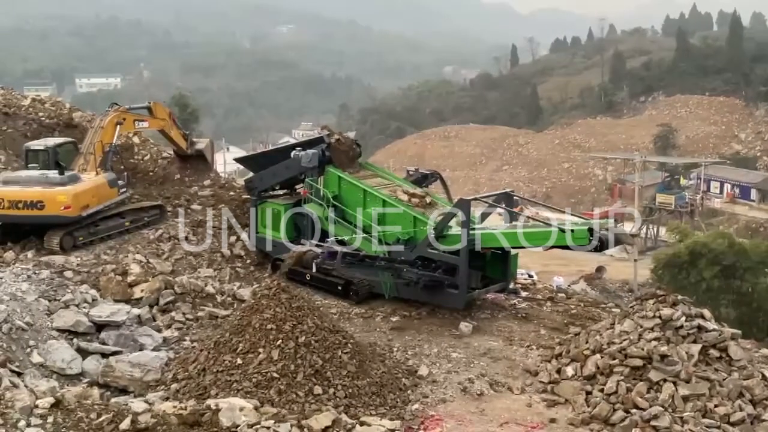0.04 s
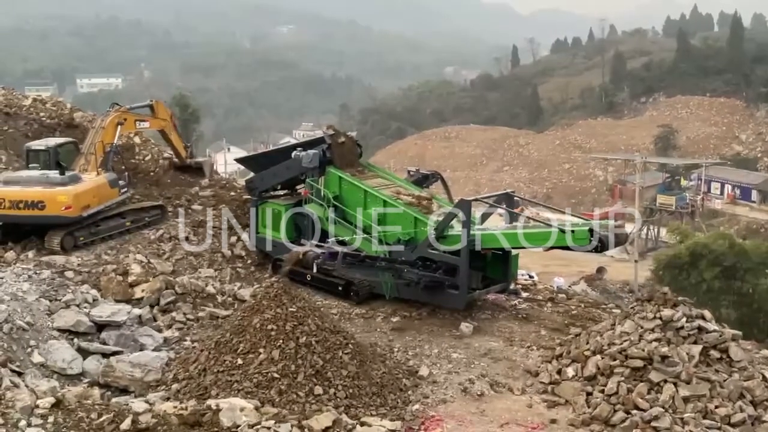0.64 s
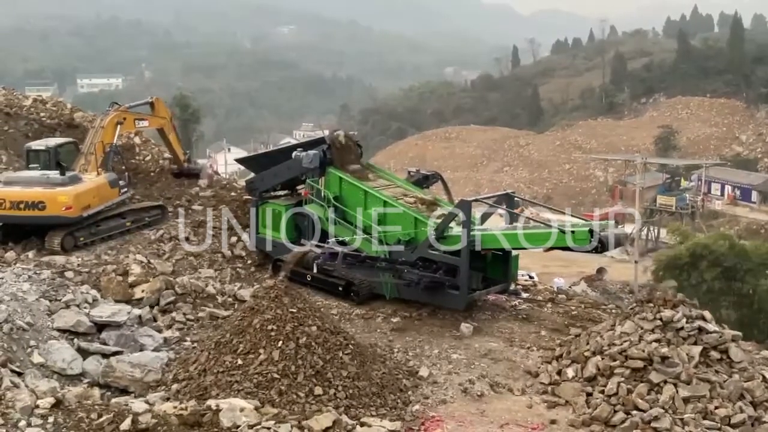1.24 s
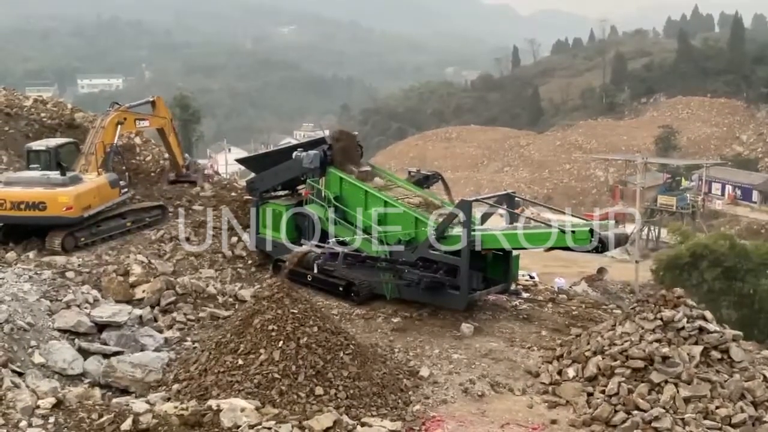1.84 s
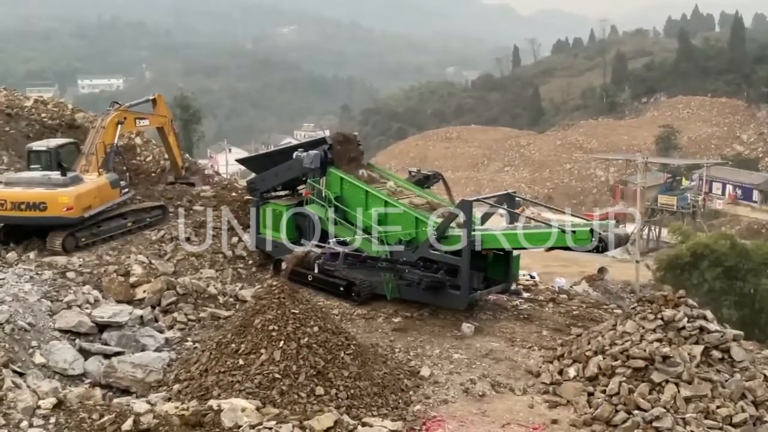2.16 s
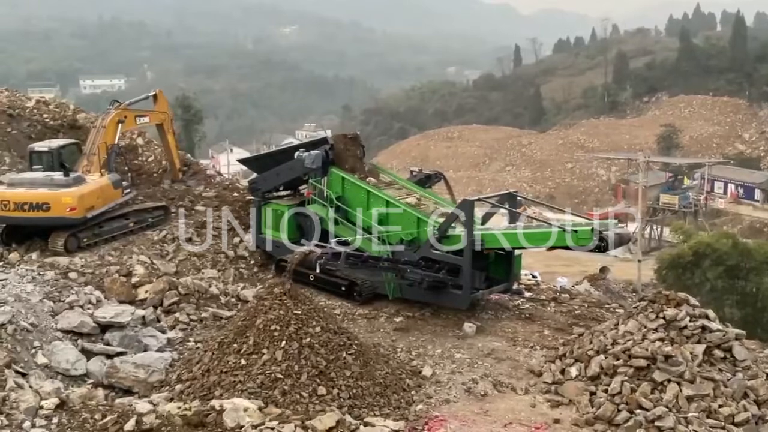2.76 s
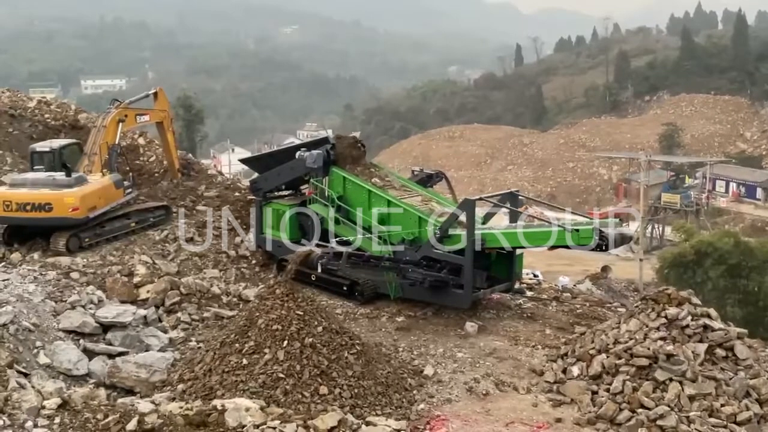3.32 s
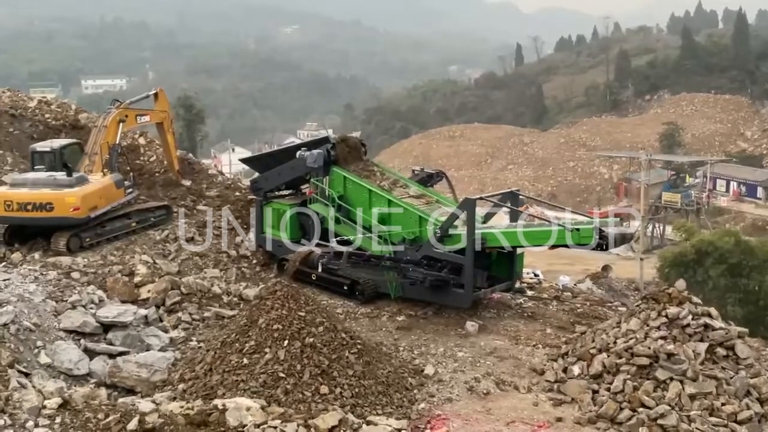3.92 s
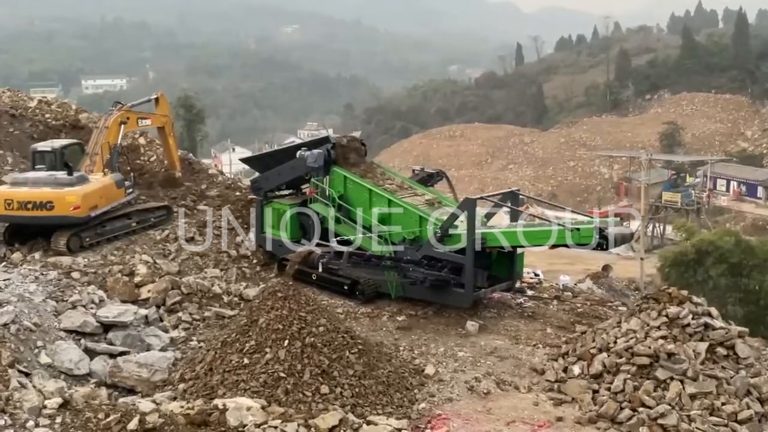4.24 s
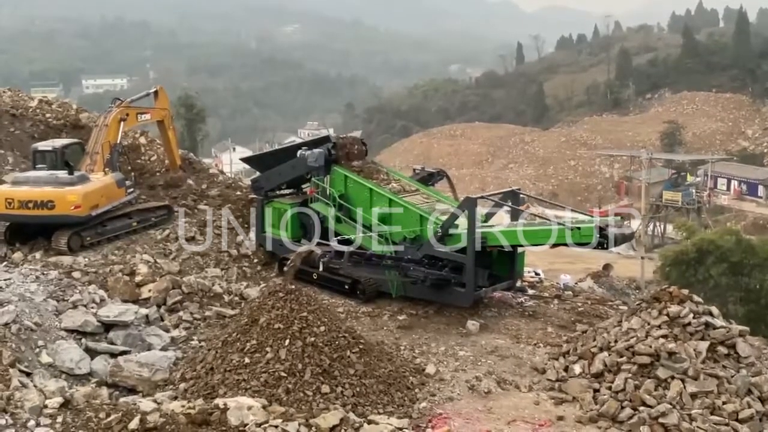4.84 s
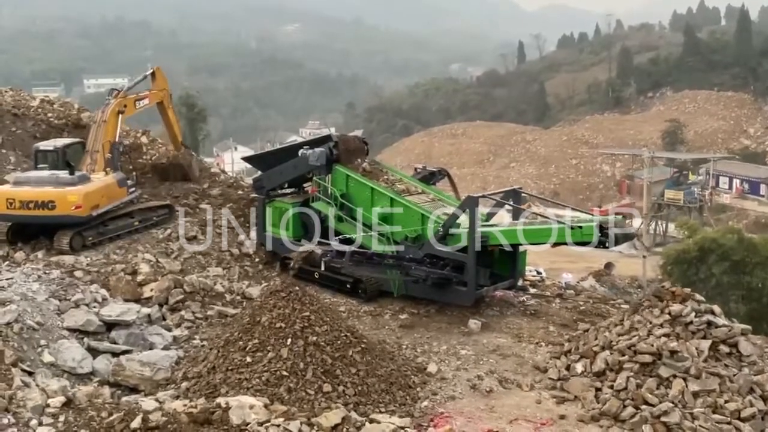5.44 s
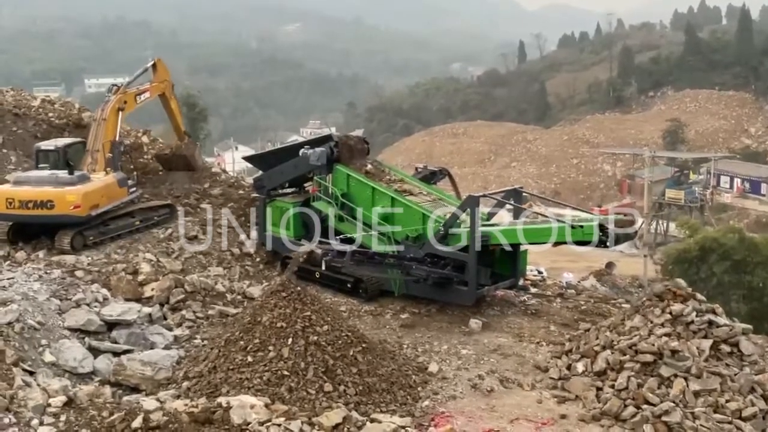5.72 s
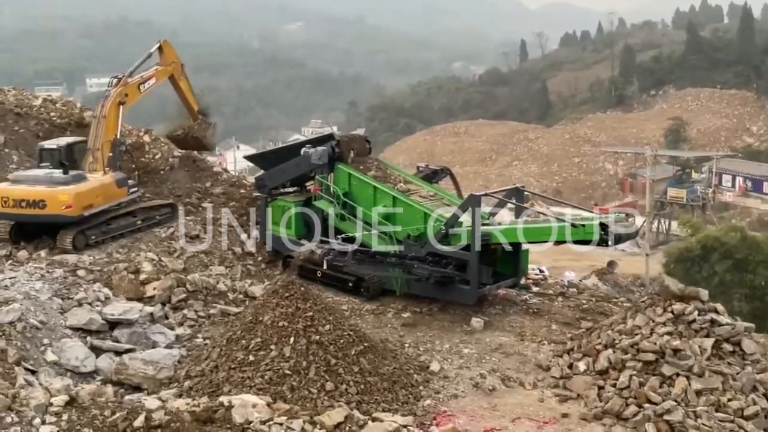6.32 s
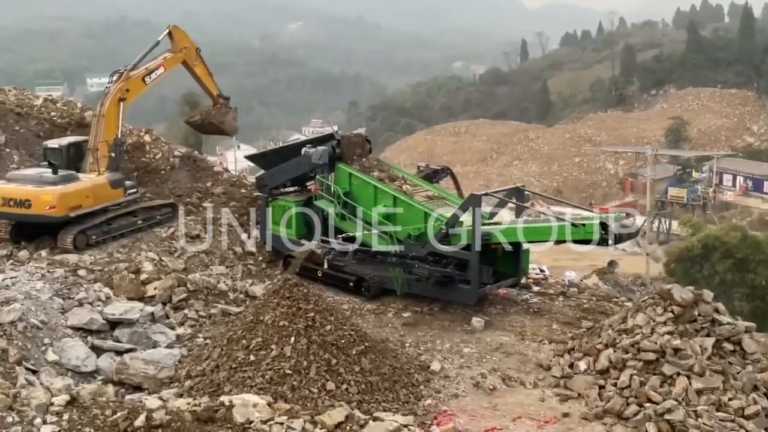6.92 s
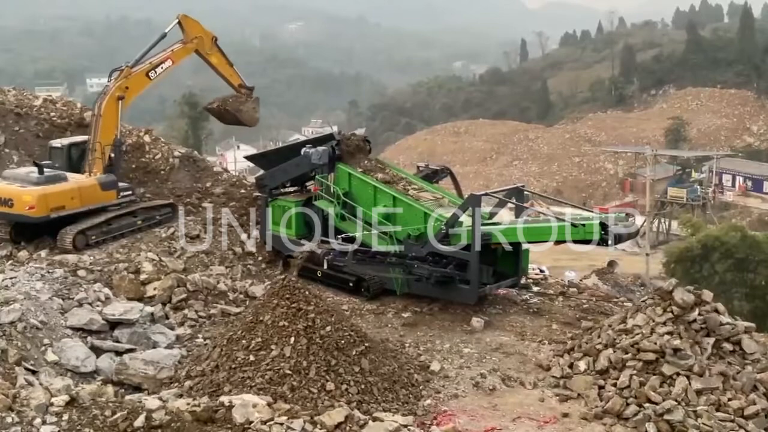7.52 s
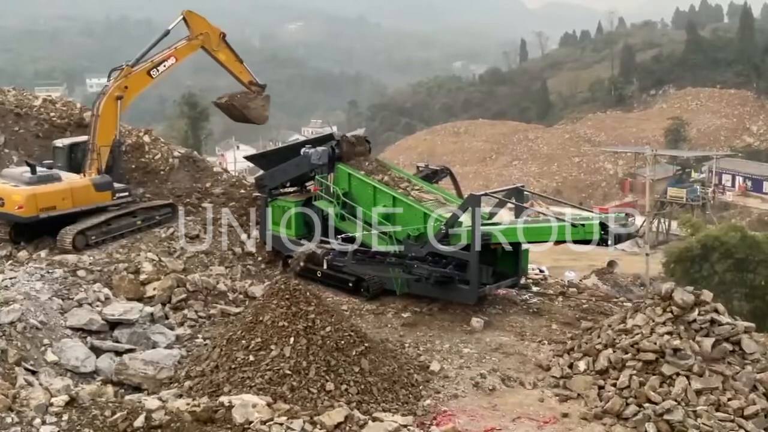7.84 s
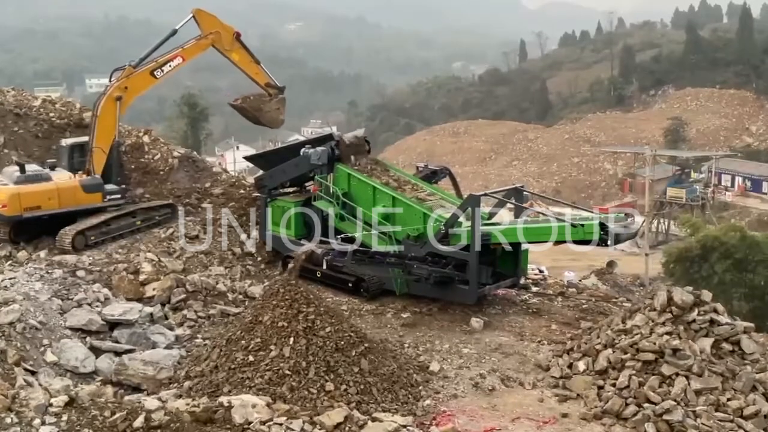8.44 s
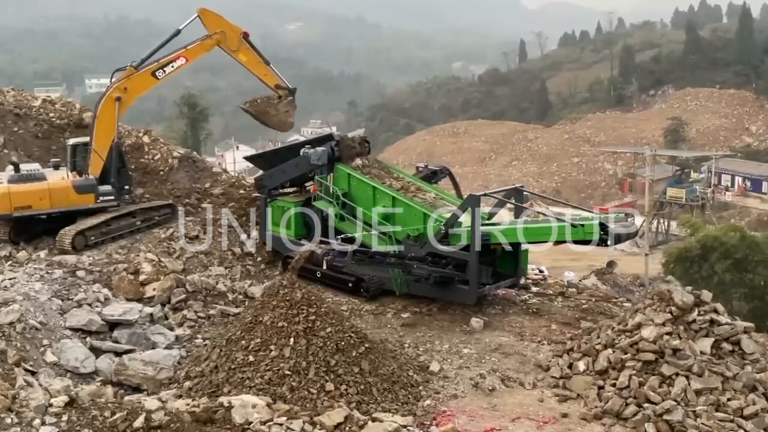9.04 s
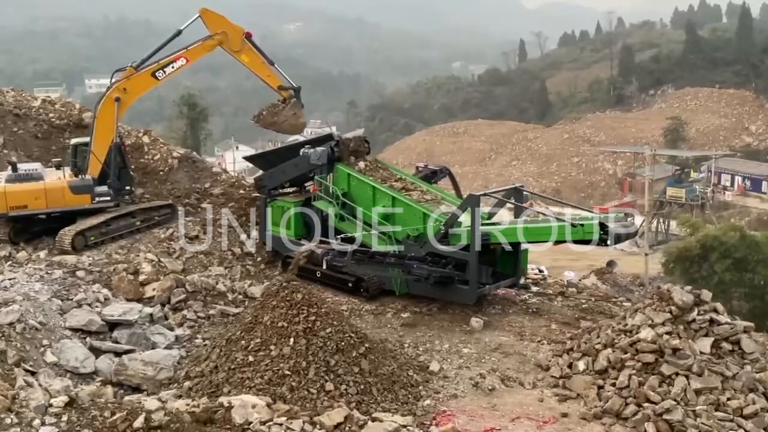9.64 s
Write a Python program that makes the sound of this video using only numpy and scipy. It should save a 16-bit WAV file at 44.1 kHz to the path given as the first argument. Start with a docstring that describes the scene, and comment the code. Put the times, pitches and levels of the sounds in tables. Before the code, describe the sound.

A rock screening machine works some way off in an open quarry. Stones and grit clatter in surges over its shaking steel deck, large stones knock and clang, and boulders draw hollow booms from the panels. Diesel engines drone underneath with an excavator's faint whine. The clatter thins twice, then grows heavy again near the end, with a short echo off the rock heaps.

```python
"""A mobile screening plant, a big shaking sieve for rock, works some way off in an open quarry.
From the start diesel engines drone, an excavator's pump whines faintly and rock clatters in surges over
the steel deck. Large stones knock and clang, boulders make the panels boom, and at 0.7 s comes the first
of a few squeaks. The load thins near 4.5 s, the whine shifts as the excavator lifts its arm at 5.8 s, and
after another lull the rock is heavy again by 8 s. All along, heaps of waste rock scatter the clatter."""
import sys
import numpy as np
from scipy import signal
from scipy.fft import rfft, irfft, next_fast_len
from scipy.io import wavfile
from scipy.ndimage import map_coordinates

SR = 44100
rng = np.random.default_rng(int(sys.argv[2]) if len(sys.argv) > 2 else 0)


def transcribe(u):
    """Save the signal u as a 16-bit wav file named by the first command-line argument.

    u: samples, shape (n,) or (channels, n), limited to [-1, 1]; the rate is SR.
    q: integer samples, one column per channel.
    """
    v = np.clip(np.atleast_2d(u).T, -1, 1)
    q = np.round(v * 32767).astype(np.int16)
    wavfile.write(sys.argv[1], SR, q)


N = 426447


def amp(db):
    """Turn decibels into a number to multiply by."""
    return 10 ** (np.asarray(db) / 20)


def unit(x):
    """Scale a sound to an average (rms) strength of 1."""
    return x / np.sqrt(np.mean(x ** 2) + 1e-20)


def along(points, hz):
    """Read between (frequency, value) points, spacing the frequencies by octaves."""
    f, v = np.transpose(points)
    return np.interp(np.log(hz + 1), np.log(f + 1), v)


def curve(points):
    """Join (time, value) points with straight lines, one value a sample."""
    return np.interp(np.arange(N) / SR, *np.transpose(points))


def wobble(rate):
    """A smooth curve through `rate` random values a second."""
    return map_coordinates(rng.standard_normal(int(N * rate / SR) + 4), [np.arange(N) * rate / SR])


def coloured(x, db_at):
    """Turn each frequency up or down by db_at(frequency) decibels."""
    m = 2 * next_fast_len(N // 2 + SR // 4)
    cepstrum = irfft(np.log(amp(db_at(np.fft.rfftfreq(m, 1 / SR))) + 1e-6))
    cepstrum[1:m // 2] *= 2  # folded so that ringing follows a hit and never comes before it
    cepstrum[m // 2 + 1:] = 0
    return irfft(rfft(x, m) * np.exp(rfft(cepstrum)), m)[:N]


def shaped(x, tone):
    """Give a sound the tone of a (frequency, level) table."""
    return coloured(x, lambda hz: along(tone, hz))


def add(track, s, sound):
    """Mix a sound into a track at s seconds."""
    start = max(round(s * SR), 0)
    track[start:start + len(sound)] += sound[:N - start]


def contacts(rate, spread_db):
    """Tiny hits of random size at random moments, about `rate` a second."""
    hit = rng.random(N) < rate / SR
    return hit * rng.choice([-1, 1], N) * amp(spread_db * np.clip(rng.standard_normal(N), -2, 2))


def swell(start, length, attack, release):
    """A volume that rises, holds and dies away; all times are in seconds."""
    t = np.maximum(np.arange(N) / SR - start, 0)
    return (1 - np.exp(-t / attack)) * np.exp(-np.maximum(t - length, 0) / release)


# How loud the exhaust is: (time [s], level [dB])
EXHAUST_LEVEL = [(0.0, -38), (0.54, -37), (0.97, -35.5), (1.78, -32.5), (2.26, -33.5), (4.15, -35.5),
                 (4.3, -38.5), (5.41, -31), (7.35, -38), (8.8, -32.5), (9.67, -39)]
# The notes in its drone: (pitch [times the engine speed], relative level [dB])
EXHAUST_NOTES = [(3, -6.5), (5, -5.5), (8, -4.5), (10, -6), (12, -1.5), (15, 1.5), (18, -9)]
# The tone of the fans and belts: (frequency [Hz], relative level [dB])
FAN_TONE = [(10, -35), (28, -28), (45, -12), (62, -16), (85, -0.5), (105, -10), (200, 1.5), (400, -5),
            (1000, -4.5), (3000, -31), (9000, -74)]
def engines(crank_hz=17.35, drift_hz=0.1282, flutter_db=2.5, slip_turns=0.025):
    """Diesel exhaust drones in step with the turning engine, over the roar of fans and belts."""
    turns = np.cumsum(crank_hz + drift_hz * wobble(3)) / SR
    drone = np.zeros(N)
    for multiple, db in EXHAUST_NOTES:
        gain = amp(db + flutter_db * wobble(9))
        cycles = round(multiple) * (turns + slip_turns * wobble(11))  # higher notes come out rougher
        drone += gain * np.sin(2 * np.pi * (cycles + rng.random()))
    roar = amp(-30) * unit(shaped(rng.standard_normal(N), FAN_TONE))
    return amp(curve(EXHAUST_LEVEL)) * drone + roar


# The notes in the whine: (pitch [times the pump's pitch], level [dB], change during the lift [dB])
PUMP_NOTES = [(2, -41, -5), (3, -43.5, 5), (4, -46, -2)]
def pump(pitch_hz=241.5, waver_hz=2.193, throb_hz=22.12, throb_depth=0.58, flutter_db=4.5):
    """The oil pump's pistons make a throbbing whine; its middle note stands out while the arm lifts."""
    turns = np.cumsum(pitch_hz + waver_hz * (wobble(3) + wobble(40))) / SR
    lift = swell(start=5.84, length=3.4, attack=.2, release=.3)
    throb = 1 + throb_depth * np.sin(2 * np.pi * np.cumsum(throb_hz + 2 * wobble(4)) / SR)
    whine = np.zeros(N)
    for multiple, db, lift_db in PUMP_NOTES:
        gain = amp(db + lift_db * lift + flutter_db * wobble(10))
        whine += gain * np.sin(2 * np.pi * round(multiple) * turns)
    return throb * whine


# The layer of rock that always lies on the deck: (time [s], level [dB])
ROCK_LOAD = [(0.0, -21.5), (0.6, -22), (0.85, -24), (1.08, -22), (1.21, -25), (1.35, -22), (1.94, -20.5),
             (2.2, -23), (2.31, -24.5), (2.52, -21), (2.68, -20), (3.09, -25), (3.26, -27), (3.42, -24.5),
             (3.55, -19.5), (3.78, -25.5), (4.09, -23), (4.35, -27), (4.55, -28.5), (4.79, -30),
             (4.92, -28), (5.03, -28), (5.3, -24), (5.63, -22), (6.25, -28), (6.5, -28.5), (6.68, -30.5),
             (7.05, -29), (7.35, -28.5), (7.85, -24), (8.2, -22.5), (8.45, -21), (8.64, -24.5),
             (8.8, -22.5), (8.94, -27.5), (9.05, -24.5), (9.15, -25), (9.3, -22), (9.67, -21.5)]
# Fresh rock spilling onto it:
# (start [s], length [s], clatter [dB], boom against clatter [dB], grit against clatter [dB])
ROCK_SPILLS = [(0.0, 0.044, -22.5, -3, -18), (0.12, 0.033, -23, -7, -15), (0.468, 0.092, -26.5, 2, -16),
               (.92, 0.075, -24, -16, -10), (1.28, 0.052, -29, -13, -7), (1.687, 0.11, -32.5, -7, -4.5),
               (1.78, 0.044, -24, -9, -16), (2, 0.047, -24, 4.5, -5), (2.18, 0.058, -25, 4.5, -13),
               (2.437, 0.09, -30.5, -4, -4.5), (2.608, 0.14, -20.5, 1, -9), (2.895, 0.067, -24.5, -2, -7),
               (3.21, 0.091, -21, -0.5, -9), (3.31, 0.12, -19.5, -1, -9), (3.593, 0.093, -22.5, -0.5, -8),
               (3.86, 0.13, -27, 2, -7.5), (3.964, 0.18, -26.5, 0, -6), (4.4, 0.066, -29.5, 1, -22),
               (4.8, 0.12, -31, 6, -8.5), (5.11, 0.07, -32.5, 3, -4), (5.378, 0.09, -22.3, -6, -8.5),
               (5.565, 0.17, -28.5, -17, -9), (5.916, 0.14, -22, 2.5, -10), (6.327, 0.064, -28, 4, -13),
               (6.463, 0.084, -27, -1, -12.5), (6.89, 0.04, -30, -10, -21), (7.005, 0.03, -28.5, -12, -15),
               (7.31, 0.03, -38, -1, -2.5), (7.408, 0.037, -28.5, -15, -7.5),
               (7.562, 0.034, -36.5, -13, -2), (7.62, 0.053, -29, 2, -16), (7.773, 0.21, -26.5, -7, -17),
               (8.153, 0.053, -27.5, -8, -8), (8.311, 0.064, -20, 0.5, -12.5), (8.715, 0.08, -26, -3, -10),
               (8.987, 0.031, -23, -1, -9), (9.303, 0.048, -24, -11, -22), (9.43, 0.05, -25.5, -6, -8)]
def rock_flow():
    """The lying rock and the spills add up to three changing levels in dB: clatter, boom and grit."""
    load_db = curve(ROCK_LOAD)
    usual_db = load_db.mean()
    extra_db = load_db - usual_db
    clatter = amp(load_db - 1.5) ** 2
    boom = amp(usual_db - 1 + 0.7 * extra_db) ** 2
    grit = amp(usual_db - 13.5 + 0.98 * extra_db) ** 2
    for s, length, db, boom_db, grit_db in ROCK_SPILLS:
        power = (amp(db) * swell(s, length, attack=0.0084, release=0.053)) ** 2
        clatter += power
        boom += power * amp(boom_db) ** 2
        grit += power * amp(grit_db) ** 2
    return 10 * np.log10([clatter, boom, grit])


# The tones of stones, grit and fine sand hitting the deck: (frequency [Hz], relative level [dB])
STONE_TONE = [(120, -32.5), (300, -10.5), (480, -5), (600, -4.5), (780, -3), (1000, -1.5), (1250, -2),
              (1700, -3), (2300, -9), (2900, -17.5), (3700, -17), (5000, -30), (9000, -64.5)]
GRIT_TONE = [(800, -26.5), (2200, 0), (3600, 0), (4800, -6.5), (7000, -9.5), (9000, -27.5), (10500, -20),
             (13400, -36), (14400, -46), (15200, -51)]
SAND_TONE = [(1500, -18), (5000, -0.5), (10500, -3), (13300, -8), (15000, -37)]
def shaking_deck(clatter_db, boom_db, grit_db, shake_hz=16.562):
    """Every shake throws the rock up; a thin load rattles most clearly in step with the deck."""
    throw = np.cos(2 * np.pi * (shake_hz * np.arange(N) / SR - .44))
    shake = throw * np.clip(0.5 - 0.079 * (clatter_db - clatter_db.mean()), 0, 2)
    clumps = wobble(70)
    stones = amp(-4) * unit(shaped(contacts(rate=2200, spread_db=3), STONE_TONE))
    stones += amp(-6.5) * bars() + amp(-7) * clacks()
    stones *= amp(clatter_db + 1.4 * shake + 0.22 * clumps)
    grit = unit(shaped(contacts(rate=4000, spread_db=0.5), GRIT_TONE)) + amp(-5.5) * clinks()
    grit *= amp(grit_db - 0.46 + 1.1 * shake + 0.8 * clumps)
    # big spills carry more sand, so they sound brighter
    sand_db = grit_db - 22.5 + 0.71 * (grit_db - grit_db.mean())
    sand = amp(sand_db) * unit(shaped(contacts(rate=9000, spread_db=0), SAND_TONE))
    boom = amp(boom_db - 3.5) * unit(panels(contacts(rate=1800, spread_db=2)))
    return stones + grit + sand + boom


# How the sieve's bars and the chute walls ring: (pitch [Hz], width [Hz], relative level [dB])
BAR_RINGS = [(470, 95, -2.5), (697, 64, -0.5), (863, 44, -4), (1000, 47, -2), (1650, 170, -2.5),
             (2290, 105, -4), (2893, 65, -10), (3660, 320, -12)]
def bars(uneven_db=2.0):
    """Each steel part rings as its own stones hit it, in fits and starts."""
    out = np.zeros(N)
    for hz, width, db in BAR_RINGS:
        ring = signal.lfilter(*signal.iirpeak(hz, hz / width, SR), contacts(rate=170, spread_db=3.5))
        ring = signal.sosfilt(signal.butter(2, [hz / 2, hz * 1.6], "band", fs=SR, output="sos"), ring)
        out += amp(db + uneven_db * wobble(11)) * unit(ring)
    return unit(out)


def clacks(rate=75, pitch_hz=1000, octaves=2.3, overtone=1.55, t60=0.061, spread_db=8):
    """Fist-sized stones clack with two short notes each; t60 is the seconds taken to fade by 60 dB."""
    out, t = np.zeros(N), np.arange(SR // 12) / SR
    for when, pitch, size, shape in rng.random((int(rate * N / SR), 4)):
        angle = 2 * np.pi * pitch_hz * 2 ** (octaves * (pitch - .5)) * t
        notes = np.sin(angle) - .5 * np.sin((overtone + .5 * shape) * angle)
        add(out, when * (N - 1) / SR, amp(spread_db * size - 60 * t / t60) * notes)
    return unit(out)


def clinks(rate=170, pitch_hz=3200, octaves=2.3, t60=0.1):
    """Hard chips each ring briefly at their own pitch, the higher ones more softly."""
    out, t = np.zeros(N), np.arange(SR // 20) / SR
    for when, pitch, size in rng.random((int(rate * N / SR), 3)):
        hz = pitch_hz * 2 ** (octaves * (pitch - .5))
        fade = amp(8.7 * size - 14 * pitch - 60 * t / t60)
        add(out, when * (N - 1) / SR, fade * np.sin(2 * np.pi * hz * t))
    return unit(out)


# How the deck and hopper panels ring: (pitch [Hz], width [Hz], relative level [dB])
PANEL_RINGS = [(134, 21, -2.5), (167, 41, -11.5), (207.3, 32, 2.5), (257, 52, -1), (324, 29, -5),
               (438, 49, -6.5)]
def panels(blows):
    """Blows draw a hollow boom from the steel panels, which give off little deep bass."""
    def db_at(f):
        power = sum(amp(db) ** 2 * (f * width) ** 2 / ((hz * hz - f * f) ** 2 + (f * width) ** 2)
                    for hz, width, db in PANEL_RINGS)
        given_off_db = along([(70, -20), (105, -10), (130, 5), (500, 3.5), (1200, -12.5)], f)
        return 10 * np.log10(power + 1e-12) + given_off_db
    return coloured(blows, db_at)


# The slow rise and fall of the rumble: (time [s], relative level [dB])
RUMBLE_LEVEL = [(0.0, -50), (0.35, -68), (4.15, -45), (4.66, -61), (6.27, -51), (7.54, -61), (8.0, -48),
                (9.67, -55)]
# The tone of the shaking ground: (frequency [Hz], relative level [dB])
GROUND_TONE = [(8, -21), (25, -10), (45, -2), (65, 1.5), (100, -4), (200, -25), (600, -62)]
def frame_rumble(boom_db):
    """The machine's frame rumbles on the ground, more so under heavy rock."""
    level_db = curve(RUMBLE_LEVEL) + 9 + 0.65 * (boom_db - boom_db.mean())
    return amp(level_db) * unit(shaped(contacts(rate=400, spread_db=0), GROUND_TONE))


# Large stones striking steel:
# (time [s], strength [dB], splinters against strength [dB], clang level [dB], bar's pitch [Hz])
STONE_HITS = [(.026, -10, -27, -19, 1162), (.15, -2, -25, -24, 705), (.172, -4, -24, -24, 1060),
              (.21, -9, -25, -28, 1500), (.511, 1, -28, -17, 910), (.559, -3, -27, -16, 1000),
              (.929, -10, -28, -20, 1550), (.984, -10, -24, -15.5, 1786), (1.053, -8, -26, -21, 947),
              (1.167, -1, -23, -28, 1700), (1.23, -3.5, -28, -30, 1300), (1.295, -14, -25, -21, 1700),
              (1.835, -5, -27, -18, 650), (1.886, -5, -24, -32, 990), (2.006, -6, -26, -17, 996),
              (2.02, -4, -22, -19, 2030), (2.071, -12, -28, -18, 434), (2.112, -13, -27, -19, 1020),
              (2.185, -4, -27, -24, 1050), (2.2, -2, -27, -23, 1500), (2.254, -11, -29, -22, 1090),
              (2.441, -3, -20, -25, 2250), (2.718, -8, -26, -28, 980), (2.941, -14, -26, -18, 465),
              (3.225, -16, -28, -36, 990), (3.353, -3, -24, -17, 976), (3.616, -3, -25, -34, 1000),
              (3.671, -6, -25, -21, 1291), (4.046, -5, -16, -34, 990), (4.109, -11, -24, -20, 1580),
              (4.322, -15, -7, -44, 990), (4.441, -18, -27, -26, 689), (4.463, -13, -27, -23, 861),
              (4.907, -10, -15, -25, 636), (5.151, -4.5, -23, -22, 1000), (5.391, -10, -22, -34, 1400),
              (5.502, -8, -29, -34, 760), (5.64, -7, -25, -18, 1205), (5.686, -17, -29, -21, 895),
              (6.012, -6, -23, -14, 977), (6.043, -14, -28, -15, 425), (6.344, -11, -29, -25, 556),
              (6.366, -14, -27, -19, 473), (6.515, -13, -27, -22, 818), (6.548, -22, -28, -20, 473),
              (6.729, -15, -15, -24, 730), (6.899, -11, -24, -28, 1450), (6.94, -14, -29, -29, 760),
              (7.022, -12, -26, -30, 620), (7.072, -7, -32, -20, 1020), (7.097, -15, -28, -25, 468),
              (7.208, -9.5, -14, -28, 1980), (7.222, -11, -26, -24, 818), (7.337, -13, -18, -36, 990),
              (7.439, -9, -22, -27, 1410), (7.457, -4, -30, -18, 990), (7.509, -20, -30, -25, 514),
              (7.525, -17, -31, -20, 850), (7.649, -7, -27, -25, 900), (7.864, -8, -28, -38, 990),
              (8.161, -14, -26, -20, 424), (8.344, 0, -25, -23, 1060), (8.362, -3, -24, -22, 1400),
              (8.41, -8, -26, -23, 760), (8.476, -10, -27, -26, 700), (8.525, -4, -23, -20, 480),
              (8.599, -5.5, -29, -28, 980), (8.665, -13, -24, -26, 2210), (8.85, -10, -27, -18, 473),
              (9.021, -4, -17, -18, 1150), (9.325, -10, -26, -22, 760), (9.435, -7, -22, -28, 770),
              (9.449, -5, -24, -16, 1110), (9.618, -11, -25, -26, 1550)]
# The notes of a struck bar: (pitch [times the bar's pitch], relative level [dB], time to fade 60 dB [s])
CLANG_NOTES = [(0.999, 0, 0.063), (1.08, -7, .05), (1.68, -14, 0.068), (2.3, -23, .06), (2.8, -15, .05)]
def knocks(crack_t60=0.034, splinter_t60=0.031, thud_t60=0.036, snap_t60=0.0047, snap_db=5, thud_db=-6.5):
    """A large stone lands with a snap and a crack, sheds splinters, rings a bar and thumps the deck."""
    cracks, splinters, thuds, clangs = np.zeros((4, N))
    t = np.arange(SR // 5) / SR
    for s, db, splinter_db, clang_db, hz in STONE_HITS:
        crack, splinter, thud = rng.standard_normal((3, len(t)))
        add(cracks, s, amp(db - 60 * t / crack_t60) * crack)
        snap_and_fade = amp(snap_db - 60 * t / snap_t60) + amp(-60 * t / splinter_t60)
        add(splinters, s, amp(db + splinter_db) * snap_and_fade * splinter)
        add(thuds, s, amp(db + thud_db - 60 * t / thud_t60) * thud)
        for ratio, note_db, t60 in CLANG_NOTES:
            fade = amp(clang_db + note_db - 60 * t / t60)
            add(clangs, s, rng.choice([-1, 1]) * fade * np.sin(2 * np.pi * hz * ratio * t))
    return shaped(cracks, STONE_TONE) + shaped(splinters, GRIT_TONE) + panels(thuds) + clangs


# Boulders rolling over: (time [s], level [dB], panel's pitch [Hz])
BOULDER_ROLLS = [(.135, -17.5, 208), (1.05, -22, 236), (1.2, -21, 247), (1.679, -16.5, 204),
                 (2.125, -19, 250), (2.31, -20, 245), (2.61, -21, 226), (2.665, -19.5, 262),
                 (2.68, -24, 138), (2.9, -17, 226), (3.041, -17.5, 192), (3.335, -20.5, 130),
                 (3.6, -16, 196), (3.64, -25.5, 130), (3.981, -16.5, 198), (3.985, -31, 88),
                 (3.99, -27, 130), (4.095, -16.5, 236), (4.1, -31, 56), (4.42, -26, 236), (4.5, -20.5, 242),
                 (5.205, -21, 193), (5.925, -16, 193), (6.02, -23, 200), (6.05, -16, 290), (6.06, -24, 377),
                 (6.1, -23, 320), (6.135, -20.5, 257), (6.164, -26, 241), (6.35, -28, 290),
                 (6.395, -23, 163), (6.825, -21, 260), (7.375, -27, 150), (7.555, -25, 269),
                 (7.685, -27, 279), (8.046, -18, 215), (8.147, -18, 301), (8.325, -22, 213),
                 (8.39, -24, 133), (8.465, -18, 240), (8.53, -19, 254), (8.84, -26, 85), (8.854, -16, 261),
                 (9.03, -19, 217), (9.329, -19.5, 230), (9.49, -16.5, 226), (9.564, -21.5, 239),
                 (9.62, -19.5, 239)]
def boulders(pitch_over_width=2.97):
    """Each boulder grinds over one panel, which booms around its own pitch."""
    out = np.zeros(N)
    roll = swell(start=0, length=0.023, attack=0.018, release=0.021)[:SR // 4]
    edge = 1 + .5 / pitch_over_width
    for s, db, hz in BOULDER_ROLLS:
        band = signal.butter(2, [hz / edge, hz * edge], "band", fs=SR, output="sos")
        boom = roll * signal.sosfilt(band, rng.standard_normal(SR))[-len(roll):]
        add(out, s, amp(db) * np.linalg.norm(roll) * boom / np.linalg.norm(boom))
    return out


# Stones skidding on steel: (time [s], pitch [Hz], level [dB], half the length [s])
SKIDS = [(.737, 6804, -36, 0.016), (.806, 6837, -41, 0.0096), (1.287, 6500, -41, .012),
         (4.353, 6966, -44, .012), (4.62, 6900, -41, 0.02), (6.427, 9453, -52, .035),
         (6.427, 12050, -55, .02), (6.43, 14600, -64, .03), (9.009, 6910, -33, 0.013)]
def squeaks(waver_hz=160):
    """A sliding edge makes the steel sing for a moment at an unsteady pitch."""
    t, out = np.arange(N) / SR, np.zeros(N)
    drift = waver_hz * np.cumsum(wobble(600)) / SR
    for s, hz, db, half in SKIDS:
        out += amp(db) * np.exp(-((t - s) / half) ** 2) * np.sin(2 * np.pi * (hz * t + drift))
    return out


# How long the echo from the heaps lasts: (frequency [Hz], time to fade 60 dB [s])
ECHO_FADE = [(150, 0.36), (2000, 0.34), (10000, 0.18)]
def heap_echo(x, echo_db):
    """The sound itself plus a short echo off the heaps, which keeps changing as the stones move."""
    out, step = x.copy(), SR // 32
    starts = range(0, N, step)  # each short slice of sound gets its own echo
    hz, t, noise = signal.stft(rng.standard_normal((len(starts), SR // 5)), SR, nperseg=256)
    fade = amp(-60 * t / along(ECHO_FADE, hz)[:, None])
    tails = signal.istft(noise * fade, SR, nperseg=256)[1]
    for start, tail in zip(starts, tails):
        echo = signal.fftconvolve(x[start:start + step], tail / np.linalg.norm(tail))
        add(out, start / SR, amp(echo_db) * echo)
    return out


def scene():
    """Rock and machines all reach one distant microphone."""
    clatter_db, boom_db, grit_db = rock_flow()
    rock = heap_echo(shaking_deck(clatter_db, boom_db, grit_db) + squeaks(), echo_db=-7)
    rock += heap_echo(knocks(), echo_db=-6.5)
    return (rock + boulders() + engines() + pump() + frame_rumble(boom_db))[None]


# Narrow ranges that the microphone picks up poorly: (frequency [Hz], width [Hz], level change [dB])
MIC_DIPS = [(1420, 23, -3.5), (1916, 68, -13), (2660, 170, -2.5), (3306, 48, -11.5), (3910, 30, -12),
            (8300, 516, -19.5), (8190, 204, -45), (11980, 670, -9)]
def record(dry, top_hz=15050):
    """The microphone weakens a few narrow ranges and hears nothing above top_hz."""
    dips_db = lambda f: sum(db * np.exp(-((f - hz) / width) ** 2) for hz, width, db in MIC_DIPS)
    heard = coloured(dry[0], dips_db)
    m = next_fast_len(N + SR // 2)
    below_top = np.fft.rfftfreq(m, 1 / SR) < top_hz
    return irfft(rfft(heard, m) * below_top, m)[None, :N]


dry = scene()
out = record(dry)
transcribe(out)
```